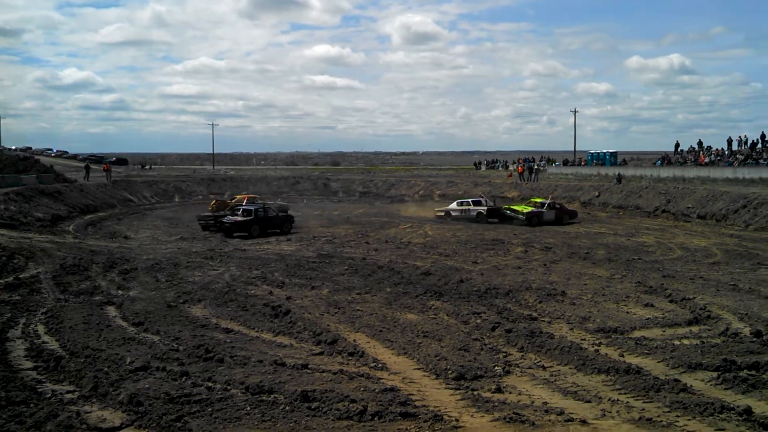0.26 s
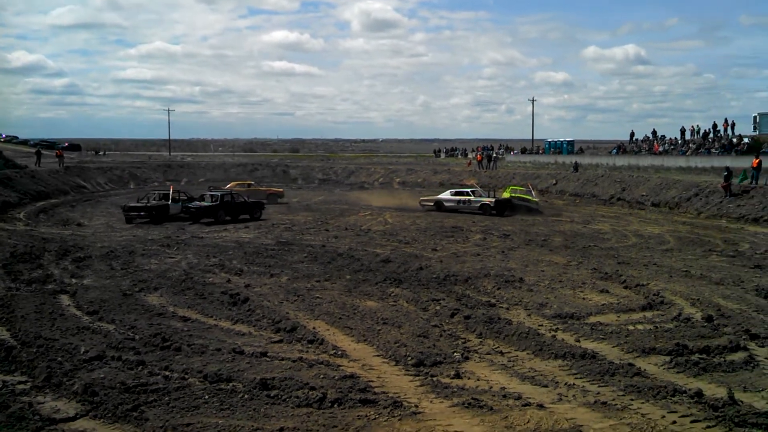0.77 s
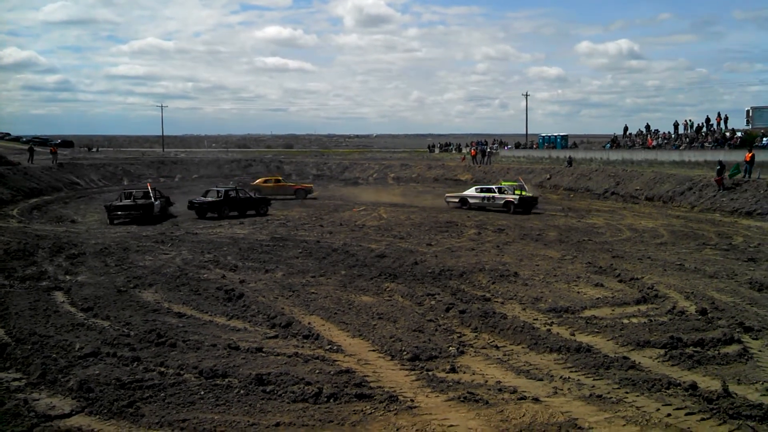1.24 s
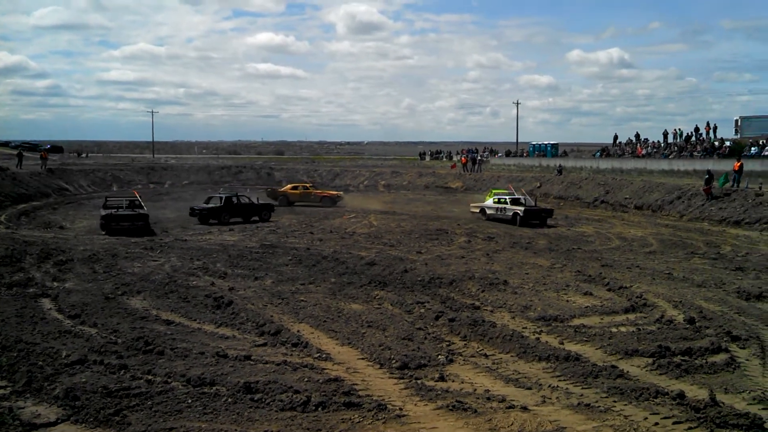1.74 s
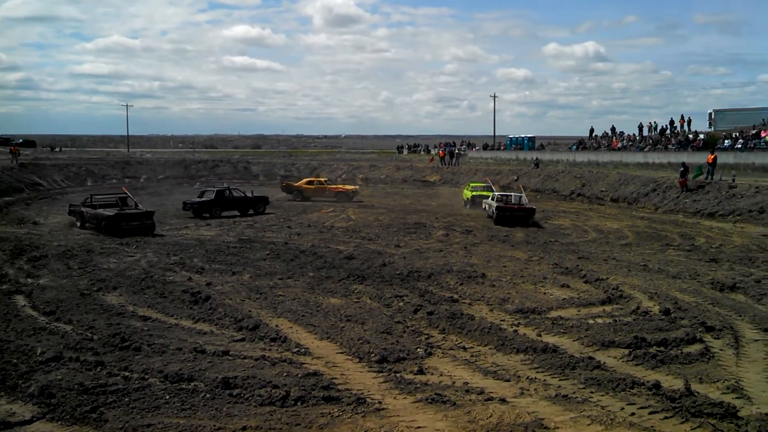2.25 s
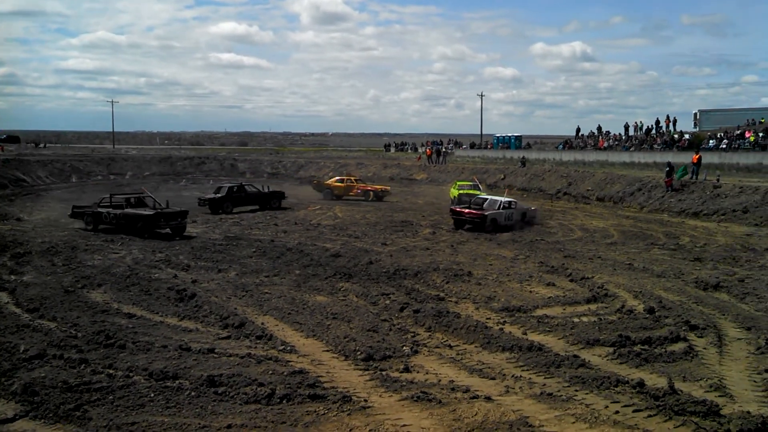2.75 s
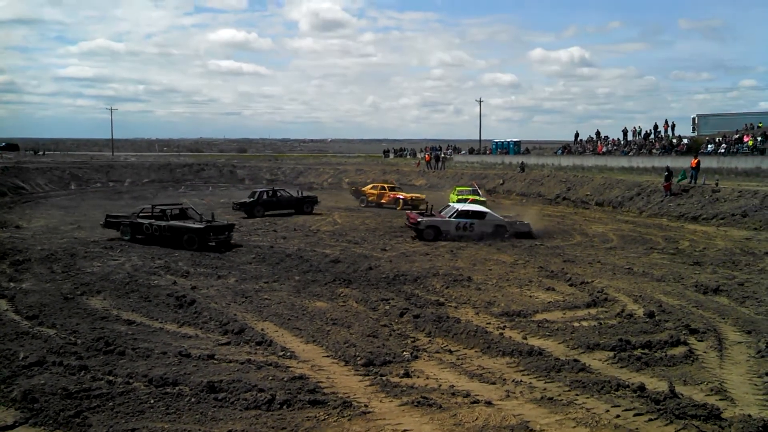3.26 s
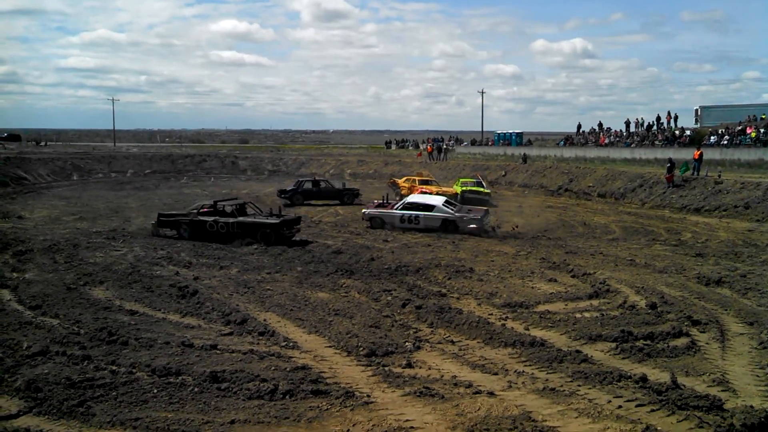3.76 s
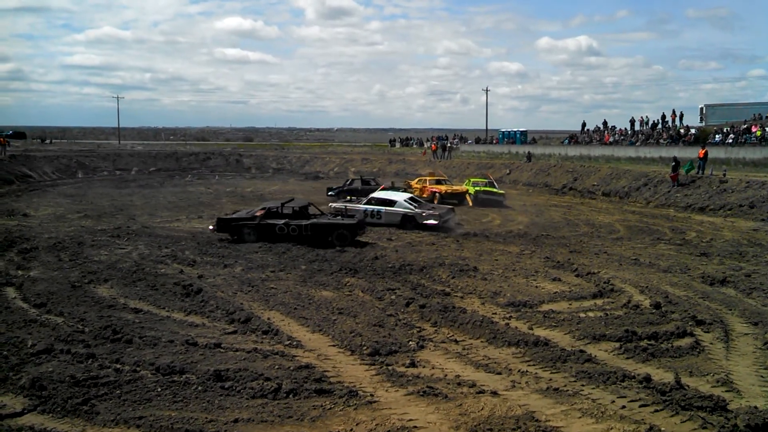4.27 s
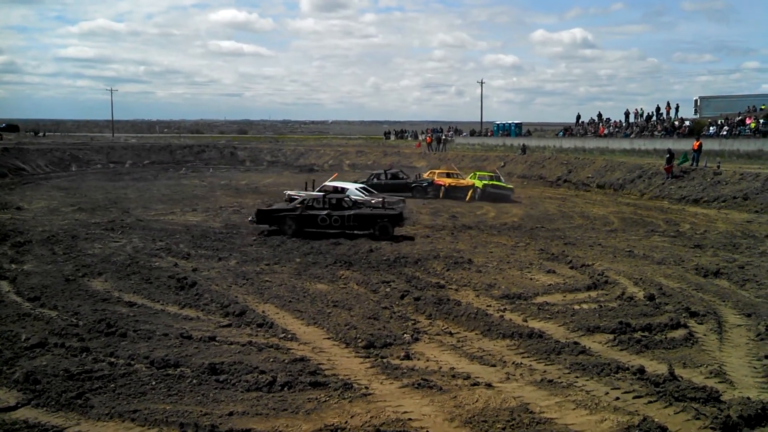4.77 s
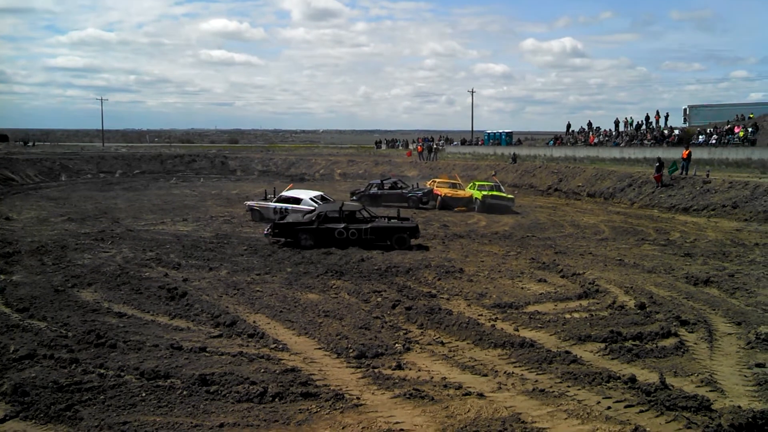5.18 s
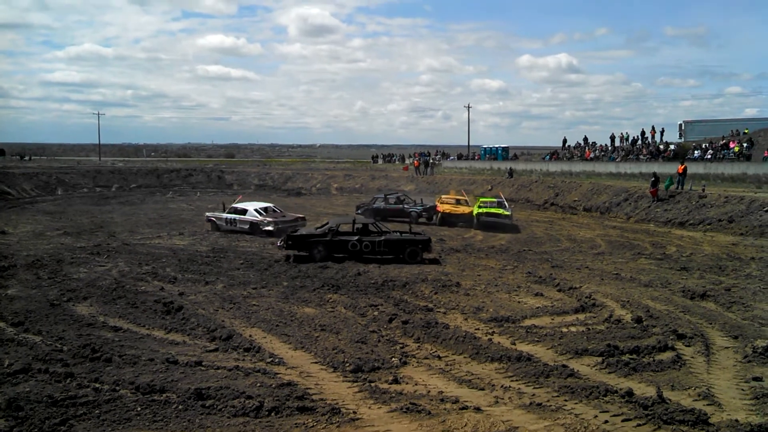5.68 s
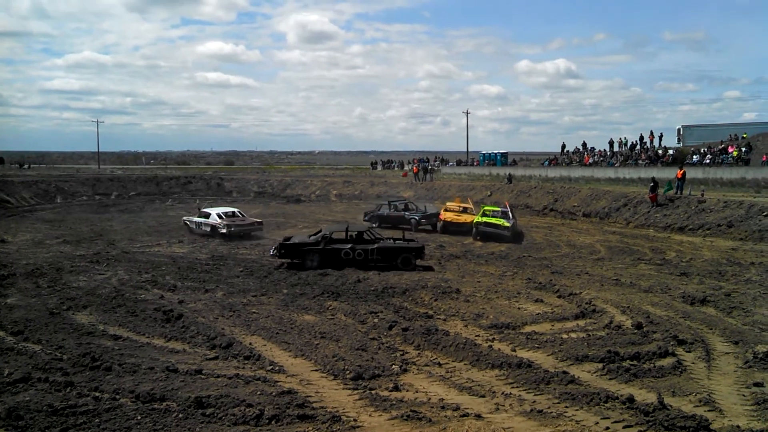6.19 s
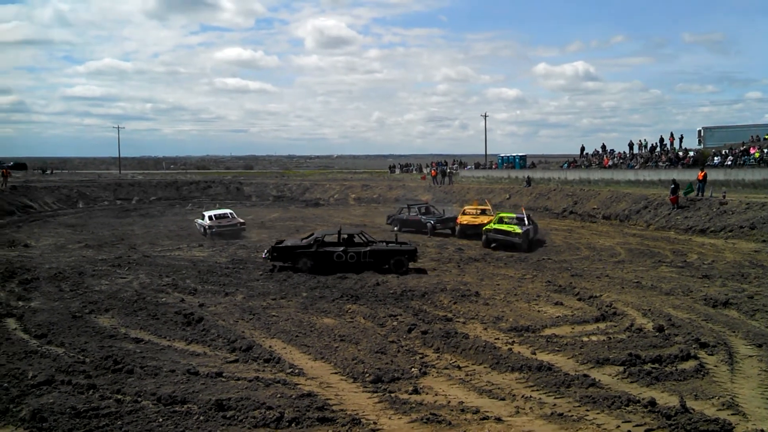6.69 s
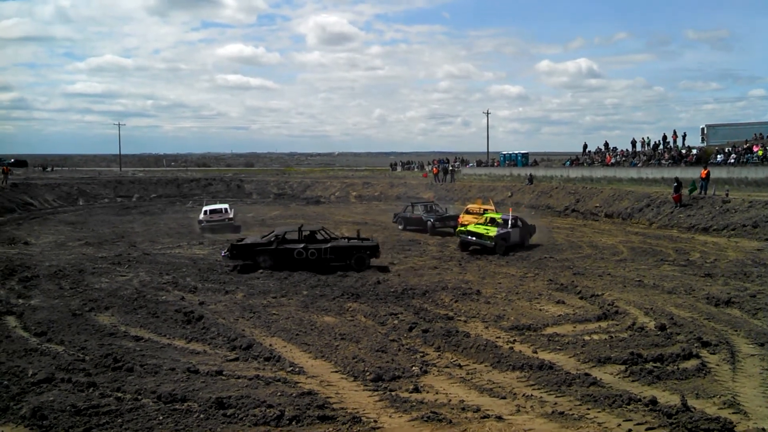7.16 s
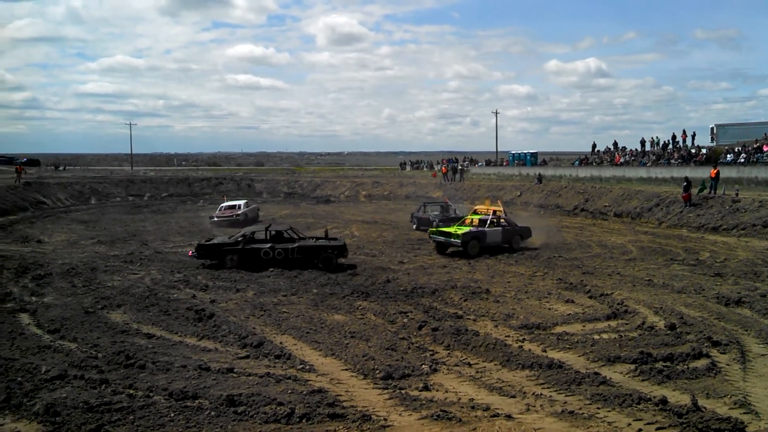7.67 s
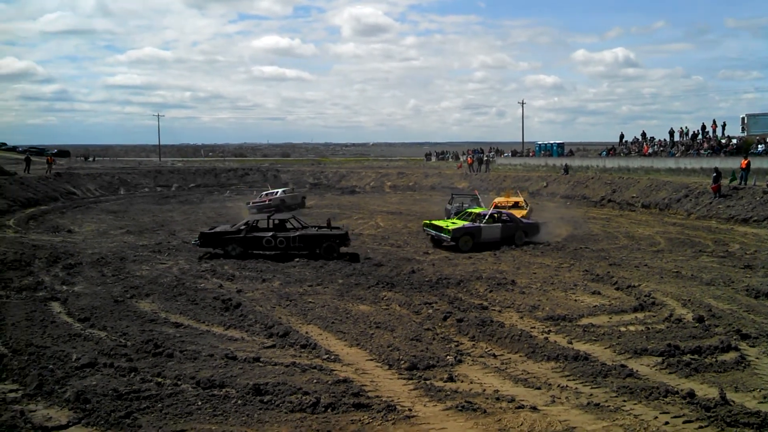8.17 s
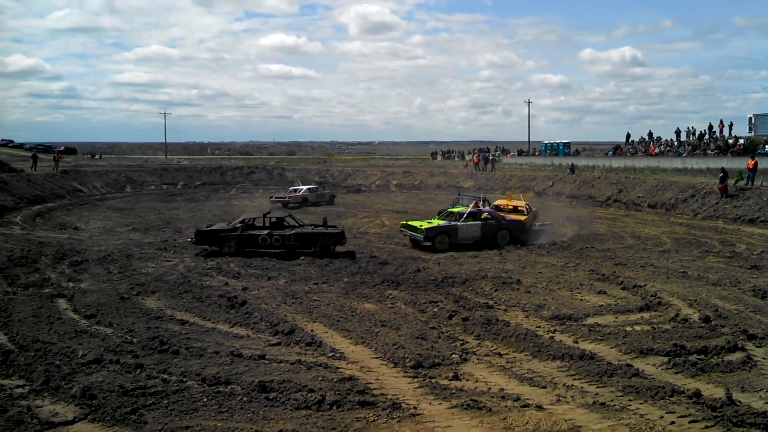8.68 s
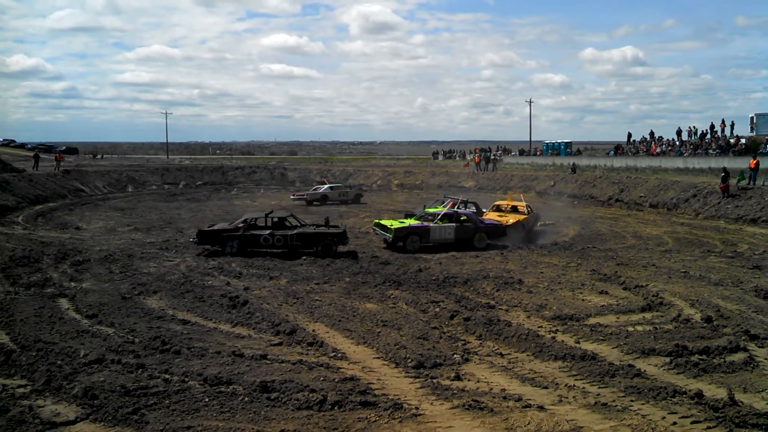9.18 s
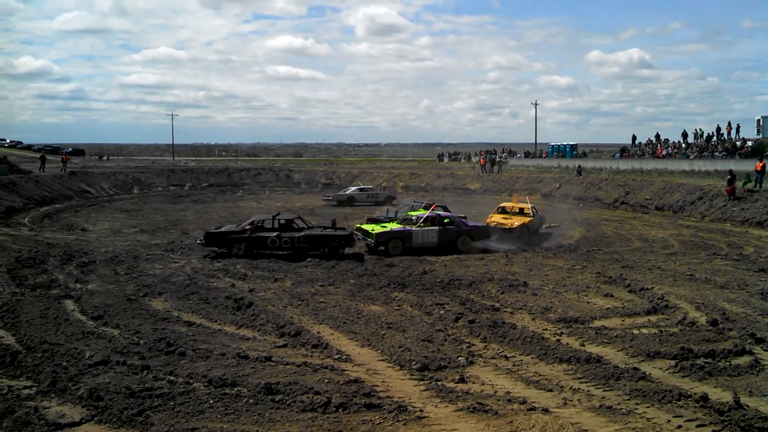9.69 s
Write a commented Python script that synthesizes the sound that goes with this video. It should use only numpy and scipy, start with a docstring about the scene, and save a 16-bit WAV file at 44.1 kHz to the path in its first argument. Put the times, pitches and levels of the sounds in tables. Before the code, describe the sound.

Several old cars with open exhausts rev in overlapping bursts in a dirt arena, heard on a phone some thirty metres away. A raspy engine starts, another climbs steadily in pitch, and others trade stabs of throttle. Exhaust pops and ticks cluster midway, and a deeper engine labours at the end. Spinning wheels throw dirt with a grainy hiss while further cars rumble behind.

```python
"""Open-pipe cars in a dirt arena

Four old eight-cylinder cars rev in bursts, with pops and ticks, some thirty metres from a phone.
Each engine sings the orders of its uneven firing cycle and spits gas once a firing.
Spinning wheels throw dirt, a pipe rings, and further cars rumble behind.
The phone widens its two ports by subtracting each, slightly late, from the other."""
import sys
import numpy as np
from scipy import signal
from scipy.fft import rfft, irfft, next_fast_len
from scipy.io import wavfile

SR = 44100
rng = np.random.default_rng(int(sys.argv[2]) if len(sys.argv) > 2 else 0)


def log_audio(samples):
    """Write samples as a 16-bit WAV file to the path given in sys.argv[1]."""
    # one column per channel
    frames = np.atleast_2d(samples).T
    # limit to full scale, then quantise
    limited = np.clip(frames, -1, 1)
    pcm = np.round(limited * 32767).astype(np.int16)
    wavfile.write(sys.argv[1], SR, pcm)


N = 438348
PADDED = next_fast_len(N, real=True)
LOG_BINS = np.log(np.maximum(np.arange(PADDED // 2 + 1), 1) * SR / PADDED)


def undb(db):
    """Decibels to gain."""
    return 10 ** (np.asarray(db) / 20)


def unit_rms(x):
    """Scale to an RMS of one."""
    return x / np.sqrt(np.mean(x ** 2))


def along(table):
    """Spread the columns that follow f/Hz over every bin of the spectrum."""
    hz, *columns = np.transpose(table)
    return [np.interp(LOG_BINS, np.log(hz), c) for c in columns]


def colour(x, eq):
    """Apply an EQ curve (f/Hz, level/dB), keeping the power of white input."""
    gain = unit_rms(undb(along(eq)[0]))
    return irfft(rfft(x, PADDED) * gain, PADDED)[..., :N]


def ride(fader):
    """A fader ride (t/s, level/dB) as dB at every sample."""
    return np.interp(np.arange(N) / SR, *np.transpose(fader))


def walk(rate, size):
    """Random levels, rate a second, joined by straight lines; spread near 1."""
    at = np.arange(size) * rate / SR
    points = int(at[-1]) + 2
    return 1.2 * np.interp(at, np.arange(points), rng.standard_normal(points))


def turbulence():
    """Two unrelated rows of white noise."""
    return rng.standard_normal((2, N))


def far_cars():
    """Further engines, too tangled to follow, blur into a heaving rumble."""
    fader = [(0.0, -21.5), (0.2, -21), (0.45, -23), (0.72, -26.5), (1.19, -18.5), (1.5, -17.5), (1.9, -21),
             (2.3, -18.5), (2.6, -21.5), (2.75, -15.5), (2.9, -18), (3.1, -18.5), (3.4, -20), (3.8, -18),
             (4.1, -18.5), (4.59, -32), (5.23, -21.5), (5.6, -24.5), (6.0, -20), (6.45, -15), (6.7, -19),
             (6.87, -11.5), (6.95, -23), (7.56, -25), (8.0, -17), (8.25, -26), (8.8, -21), (8.94, -17),
             (9.05, -25), (9.38, -19), (9.5, -16.5), (9.94, -23)]  # swell of the rumble: t/s, level/dB
    eq = [(30, -28), (50, -11), (80, 6.5), (120, 12), (190, 6), (240, -4), (400, -21), (800, -12),
          (1600, -79)]  # its bass-heavy colour: f/Hz, level/dB
    return colour(turbulence() * undb(ride(fader) + 2 * walk(9, N)), eq)


def dirt_spray(crackle):
    """Spinning wheels throw dirt: a grainy hiss that grows as the engines pull."""
    fader = [(0, -39), (0.7, -33), (1.2, -18), (2.2, -56), (3.2, -20.5), (3.8, -25), (4.4, -23.5),
             (4.6, -31), (4.72, -15), (4.9, -19.5), (5.15, -25), (5.3, -26), (5.6, -22.5), (6.2, -25),
             (7, -26), (8, -48), (9, -32), (9.94, -29)]  # thrown dirt: t/s, level/dB
    eq = [(3000, -25), (6000, -2), (9500, -1), (12500, -5), (15500, -14)]  # its bright hiss: f/Hz, level/dB
    grains = undb(ride(fader) + 4 * walk(120, N) + walk(12, N))
    return colour(turbulence() * np.sqrt(crackle) * grains, eq)


def pipe_ring(rasp):
    """A pipe rings, heard when it points this way."""
    fader = [(0.0, -30), (0.45, -29.5), (0.83, -45), (1.19, -35.5), (2.5, -32.5), (3.84, -37.5),
             (4.18, -30), (4.57, -41), (5.12, -34), (5.59, -32), (5.67, -44), (6.28, -30.5), (7.28, -35.5),
             (7.36, -42), (7.69, -35), (8.83, -36.5), (9.0, -40), (9.94, -34)]  # swell of the ring: t/s, level/dB
    eq = [(900, -18.5), (1250, -8), (1420, 0), (1520, -1), (1620, -2.5), (1750, -12.5), (2100, -18.5),
          (3300, -20.5), (3900, -15.5), (4400, -23), (5500, -27)]  # pipe resonance: f/Hz, level/dB
    return colour(turbulence() * undb(ride(fader) + 1.7 * rasp), eq)


def pops_and_ticks():
    """Envelope of short pops, ticks and exhaust cracks, each a few milliseconds long."""
    hits = [(0.2912, -37), (0.408, -36), (0.4953, -28), (0.644, -29), (0.688, -26), (0.713, -18.5),
            (1.233, -28), (2.5105, -24), (2.9826, -21), (3.005, -22), (3.873, -41), (3.9518, -31),
            (4.3134, -34), (4.564, -25), (4.621, -28), (4.6752, -23), (4.7357, -24), (4.8558, -19),
            (4.9261, -31), (4.9511, -25), (5.088, -18), (5.1386, -26), (5.153, -22), (5.201, -21),
            (5.247, -25), (5.282, -17), (6.8611, -33), (7.366, -35), (7.4274, -31)]  # one pop, tick or crack a row: t/s, peak level/dB
    decay_s = .0014
    out = np.zeros(N)
    for at, db in hits:
        start = int(at * SR)
        t = np.arange(min(2000, N - start)) / SR
        out[start:start + len(t)] += undb(db) * np.exp(-t / decay_s)
    return out


def exhaust_gas(buzz, roar, crackle, rasp):
    """Gas tears out of open pipes: a throaty roar and a bright crackle, with pops and ticks on top."""
    roar_eq = [(80, -32), (200, 10), (300, -2.5), (450, 3.5), (580, 2), (700, 7.5), (850, -3), (1050, -5),
               (1300, -8), (1550, -22), (1750, -20), (2000, -7), (2500, -10), (3200, -22.5), (5000, -29.5)]  # body of the gas: f/Hz, level/dB
    crackle_eq = [(800, -100), (1800, 4.5), (2400, 1.5), (3100, 2.5), (3900, 2), (4600, -0.5), (5500, -4.5),
                  (6800, -2.5), (8000, -3.5), (10000, -1), (12500, -8.5), (15500, -16)]  # its sizzling top: f/Hz, level/dB
    crack_eq = [(200, -12), (700, -3), (1400, 17), (2200, -14), (3500, -26), (6000, -34)]  # midrange snap of the pops and ticks: f/Hz, level/dB
    pops = pops_and_ticks()
    body_noise, top_noise = turbulence(), turbulence()
    body = colour(undb(-6.5) * (buzz + body_noise * roar * undb(1.9 * rasp)), roar_eq)
    cracks = colour(undb(-3.5) * body_noise * pops, crack_eq)
    top = colour(top_noise * (undb(-.5) * crackle + undb(-1) * pops), crackle_eq)
    return body + cracks + top


def engine_note(tone):
    """Deepen the engine note by 6 dB an octave, then colour it."""
    eq = [(60, 0), (150, 0), (250, -2), (400, -1), (550, 1), (680, 0), (800, -2.5), (950, -7), (1200, -3)]  # colour on top of that tilt: f/Hz, level/dB
    tilted = undb(24) * signal.lfilter([.007], [1, -.993], tone)
    return irfft(rfft(tilted, PADDED) * undb(along(eq)[0]), PADDED)[:N]


def engine_order(cycle, k, db):
    """Harmonic k of the firing cycle; uneven burning makes it waver, the higher the faster and deeper."""
    if db <= -40:
        return 0
    wobble_db, drift_db = 3.2, 2
    depth = min(k / 16, 1) * np.clip(.4 - db / 10, .4, 1)  # strong orders hold steadier
    waver_db = wobble_db * walk(k, len(cycle)) + drift_db * walk(7, len(cycle))
    return undb(db + depth * waver_db) * np.sin(2 * np.pi * (k * cycle + rng.random()))


def throttle_burst(levels, speed, crackle_db, orders, firings):
    """One stab of throttle: start sample, engine tone, gas buzz, powers of roar and crackle."""
    jitter, scatter_db, puff_decay = .003, 2, .92  # share of speed; per firing; share of a firing
    times, *columns = np.transpose(levels)
    start, stop = int(max(times[0], 0) * SR), min(int(times[-1] * SR), N)
    t = np.arange(start, stop) / SR
    hz = np.interp(t, *np.transpose(speed))
    low_db, high_db, roar_db = (np.interp(t, times, c) for c in columns)
    # 40 ms fades, except at the edges of the scene
    since_start = t - t[0] + (t[0] < .05)
    until_end = t[-1] - t + (stop > N - .05 * SR)
    fade = np.clip(np.minimum(since_start, until_end) / .04, 0, 1)
    cycle = np.cumsum(hz * (1 + jitter * walk(30, len(t)))) / SR
    partials = [engine_order(cycle, k, db) for k, db in orders]
    tone = fade * (undb(low_db) * sum(partials[:11]) + undb(high_db) * sum(partials[11:]))
    # eight puffs a cycle: the crackle dies fast, the roar hangs on
    firing, phase = np.divmod(8 * cycle, 1)
    firing = firing.astype(int)
    puff_db = np.take(firings, firing, mode="wrap") + scatter_db * rng.standard_normal(1000)[firing]
    gas = fade * undb(roar_db)
    roar = gas * unit_rms(undb(puff_db / 2) * np.exp(-phase / (3 * puff_decay)))
    crackle = gas * undb(crackle_db) * unit_rms(undb(puff_db) * np.exp(-phase / puff_decay))
    # the pipes shape the gas alike on every cycle: a buzz above the sung orders, up to the 64th
    upper_orders = np.exp(2j * np.pi * rng.random(65)) * (np.arange(65) > len(orders))
    wavetable = unit_rms(irfft(upper_orders, 2048))
    buzz = np.interp(cycle % 1, np.arange(2048) / 2048, wavetable)
    buzz *= gas * undb(.5) * np.sqrt(128 * hz / SR)
    return start, tone, buzz, roar ** 2, crackle ** 2


def near_cars():
    """Four engines trade bursts of throttle: summed tone, buzz, roar envelope and crackle envelope."""
    # throttle, a table per burst: t/s, orders 1-11 level/dB, higher orders level/dB, roar level/dB
    raspy = [
        [(0.0, -33, -29, -22.5), (0.12, -32.5, -31, -21), (0.25, -34, -32.5, -22.5), (0.37, -30, -30, -22),
         (0.49, -33, -31.5, -23.5), (0.62, -30, -32, -25.5), (0.68, -37, -55, -40)],
        [(1.5, -50, -51, -37), (1.6, -46, -37, -22.5), (1.8, -45, -41, -21.5), (1.9, -38, -43, -44)],
        [(1.92, -37, -40, -25), (2.06, -47, -46, -22.5), (2.25, -45, -38, -19)],
        [(2.8, -44, -32.5, -34), (2.94, -25, -28.5, -27), (3.06, -30, -31, -17.5), (3.21, -28, -27.5, -19),
         (3.3, -31.5, -32, -22.5), (3.4, -30, -44, -41)],
        [(3.7, -35, -42, -40), (3.94, -51, -38, -26.5), (4.09, -29, -36, -20.5), (4.2, -32, -34, -18.5),
         (4.27, -34, -40, -22.5), (4.42, -33, -31, -22)],
        [(4.38, -34, -36, -32), (4.52, -35.5, -37.5, -28.5), (4.68, -37, -31.5, -24.5),
         (4.85, -37, -33.5, -26.5), (5.05, -35, -34.5, -24), (5.18, -38, -36, -21), (5.29, -51, -38, -24),
         (5.41, -40, -39, -24.5), (5.58, -31, -37, -24), (5.64, -40, -43.5, -30.5), (5.9, -31, -34.5, -25)],
        [(6.9, -30, -42, -39), (7.02, -31, -25, -30), (7.07, -26, -27.5, -24), (7.14, -32, -25, -26.5),
         (7.28, -28.5, -26.5, -24), (7.38, -31.5, -27.5, -27.5), (7.47, -37, -27, -26),
         (7.63, -30, -25.5, -24.5), (7.76, -27, -34.5, -28.5), (7.95, -43, -34.5, -35)],
        [(7.91, -45, -34, -29), (8.06, -32, -38, -27), (8.19, -29, -37.5, -29.5), (8.45, -50, -35, -35),
         (8.66, -30, -34, -26.5), (8.9, -28, -33.5, -28)],
    ]
    climber = [
        [(0.66, -32, -44, -24), (0.78, -31, -47, -47), (0.93, -34, -62, -49), (1.06, -38, -44, -29.5),
         (1.16, -43, -41, -26.5), (1.33, -37, -42, -30), (1.43, -25, -36, -24), (1.55, -34, -39, -22),
         (1.68, -33, -46, -45), (1.87, -29, -35.5, -19.5), (2.03, -25.5, -35, -21.5), (2.15, -29, -35, -20.5),
         (2.28, -30, -33.5, -20), (2.42, -30.5, -29, -18), (2.55, -33, -31, -17.5), (2.63, -32, -30, -15)],
        [(2.4, -43, -41, -30), (2.5, -43, -31, -23), (2.59, -30, -26.5, -19), (2.68, -36, -30, -17),
         (2.78, -35, -34.5, -28.5), (2.84, -36, -36, -20.5), (2.95, -46, -53, -17.5), (3.15, -55, -55, -34)],
    ]
    droner = [
        [(3.25, -61, -48, -24.5), (3.36, -33, -37, -19), (3.6, -30, -33.5, -21.5), (3.71, -38, -34, -24),
         (3.8, -35, -52, -44)],
        [(5.85, -50, -29, -22.5), (5.97, -30, -34, -26), (6.35, -30, -27, -25), (6.61, -30.5, -29.5, -25.5),
         (6.72, -28.5, -33, -22.5), (6.87, -43, -31, -23), (6.98, -31.5, -30, -20.5), (7.12, -32.5, -50, -20.5),
         (7.33, -38, -56, -32), (7.47, -26, -39, -21)],
    ]
    pusher = [
        [(7.45, -33, -47, -33), (7.69, -37, -26, -26), (7.81, -37, -32, -26), (8.05, -31, -30.5, -25.5),
         (8.17, -38, -29.5, -27), (8.31, -28, -39, -25.5), (8.52, -28.5, -32, -28.5), (8.62, -29, -38, -28),
         (8.72, -33, -43, -29.5), (8.9, -27, -32, -28.5), (8.98, -31.5, -35, -36), (9.18, -27, -32.5, -31),
         (9.38, -32.5, -32, -27), (9.48, -21, -24, -31)],
        [(9.43, -26, -30, -23.5), (9.53, -18.5, -28.5, -27.5), (9.65, -19.5, -31, -31.5),
         (9.94, -18.5, -28, -24)],
    ]
    # revs, as the rate of the whole eight-cylinder cycle: t/s, f/Hz
    raspy_speed = [(0.0, 32.66), (0.19, 35.75), (0.29, 35.46), (0.39, 33.06), (0.47, 31.2), (0.6, 31.9),
                   (0.68, 31.3), (1.5, 22.96), (1.9, 22.55), (1.92, 30.29), (2.0, 31.45), (2.08, 31.83),
                   (2.25, 30.1), (2.8, 27.3), (2.95, 28.0), (3.14, 31.42), (3.23, 32.12), (3.4, 30.8),
                   (3.7, 22.63), (4.09, 24.55), (4.27, 27.26), (4.37, 27.42), (4.56, 26.8), (4.85, 27.95),
                   (5.13, 25.55), (5.25, 25.29), (5.48, 25.23), (5.9, 24.37), (6.9, 28.49), (7.09, 33.04),
                   (7.19, 34.46), (7.28, 34.95), (7.4, 34.2), (7.62, 31.95), (7.76, 29.17), (7.93, 24.9),
                   (8.04, 24.07), (8.33, 23.5), (8.6, 25.3), (8.9, 25.69)]
    climber_speed = [(0.66, 14.62), (0.93, 18.6), (1.06, 21.01), (1.16, 21.6), (1.33, 20.72), (1.56, 20.55),
                     (1.87, 20.8), (2.03, 22.0), (2.15, 23.16), (2.26, 24.85), (2.39, 26.1), (2.47, 27.5),
                     (2.6, 29.5), (2.71, 29.4), (2.8, 29.2), (2.95, 31.4), (3.15, 34.0)]
    droner_speed = [(3.25, 22.83), (3.54, 26.4), (3.63, 26.5), (3.8, 23.14), (5.85, 22.73), (6.12, 23.27),
                    (6.35, 23.3), (6.61, 23.77), (6.72, 23.68), (6.87, 23.33), (7.12, 23.3), (7.47, 22.51)]
    pusher_speed = [(7.45, 14.55), (8.31, 19.54), (8.56, 19.55), (8.68, 20.2), (8.8, 21.0), (8.9, 21.3),
                    (9.04, 21.22), (9.38, 20.74), (9.48, 20.0), (9.6, 19.82), (9.94, 19.7)]
    # what each exhaust sings: multiple of the cycle, level/dB
    raspy_voice = [(1, -47), (2, -29), (3, -13), (4, -18), (5, -4), (6, -16), (7, -14), (8, -8), (9, -26),
                   (10, -15), (11, -16), (12, -15), (13, -5.5), (14, -18.5), (15, -13), (16, -10),
                   (17, -7.5), (18, -7.5), (19, -9.5), (20, -8.5), (21, 1.5), (22, -10), (23, -9.5),
                   (24, -6.5), (25, -13), (26, -8), (27, -9), (28, -7)]
    turned = [(1, -32), (2, -27), (3, -11), (4, -4), (5, 0), (6, -10), (7, -13), (8, -7.5), (9, -14),
              (10, -12), (11, -3.5), (12, -10), (13, 1.5), (14, -14), (15, -9), (16, -5), (17, -6.5),
              (18, -16), (19, -4), (20, -16), (21, -0.5), (22, -6.5), (23, -12), (24, -24), (25, -10),
              (26, -29)]  # the raspy car with its pipes facing away
    labouring = [(1, -47), (2, -24), (3, -11), (4, -6), (5, -1.5), (6, -6), (7, -11), (8, -3.5), (9, -7.5),
                 (10, -18), (11, -17), (12, -23), (13, -4), (14, -26), (15, -12), (16, -13.5), (17, -7),
                 (18, -9.5), (19, -3), (20, -8.5), (21, -1.5), (22, -6), (23, -8), (24, -4.5), (25, -5.5),
                 (26, -0.5), (27, -14), (28, -14)]  # the raspy car at low speed under load
    climber_voice = [(1, -45), (2, -31), (3, -28), (4, -26), (5, -10.5), (6, -16), (7, -8.5), (8, 0),
                     (9, -33), (10, -32), (11, -31), (12, -11), (13, -11.5), (14, -14), (15, -18), (16, -6),
                     (17, -10), (18, -43), (19, -14), (20, -27), (21, -4.5), (22, -45.5), (23, -7), (24, 0),
                     (25, -22), (26, -25), (27, -9), (28, -23)]
    topped = [(1, -45), (2, -33), (3, -18), (4, -17), (5, -11), (6, -5), (7, -22), (8, 1), (9, -25),
              (10, -28), (11, -17), (12, -16), (13, -21), (14, -20), (15, -27), (16, -1), (17, -14),
              (18, -19), (19, -19), (20, -13), (21, 0), (22, -5), (23, -10), (24, -1), (25, -11), (26, -4),
              (27, -5), (28, -12)]  # the climber once it tops out
    droner_voice = [(1, -50), (2, -33), (3, -36), (4, -30), (5, 1), (6, -12), (7, -24), (8, -6.5), (9, -41),
                    (10, -32), (11, -43), (12, -25), (13, -21), (14, -15), (15, -11.5), (16, -9.5),
                    (17, -20.5), (18, -68.5), (19, -12), (20, -12.5), (21, -11), (22, -12), (23, -10.5),
                    (24, -14), (25, -8), (26, -8.5), (27, -17), (28, -3), (29, -4.5), (30, -4)]
    pusher_voice = [(1, -46), (2, -33), (3, -37), (4, -14), (5, -12), (6, -6.5), (7, -61.5), (8, 2),
                    (9, -51), (10, -1), (11, -45), (12, -5), (13, -45), (14, -5), (15, -32), (16, -12),
                    (17, -20), (18, -43), (19, -21), (20, -20.5), (21, -23), (22, -58), (23, -44),
                    (24, -24), (25, -50), (26, -21), (27, -76), (28, -15), (29, -98), (30, -8)]
    loaded = [(1, -50), (2, -56), (3, -37), (4, -49), (5, -46), (6, -19.5), (7, -31), (8, -37), (9, -45.5),
              (10, -2.5), (11, -33), (12, -10), (13, -23), (14, -7), (15, -17), (16, -12), (17, -35),
              (18, -19), (19, -19), (20, -43), (21, -32), (22, -21), (23, -45.5), (24, -19), (25, -38),
              (26, -34), (27, -34), (28, -14), (29, -42), (30, -25)]  # the pusher leaning on another car
    firing_patterns = [
        [0, -4, -1, -5, 0, -3, -5, -2],
        [0, -2, -1, -3, 0, -2, -1, -3],
        [0, -4, -2, -5, -1, -3, -5, -1],
        [0, -4, -1, -4, 0, -5, -1, -4],
    ]  # lope of the eight firings, a row per car: level/dB
    crackle_trims = dict(raspy=[-6.5, -12, -26, -11.5, -11.5, -7, -7.5, -10.5], climber=[-10.5, -11],
                     droner=[-11.5, -12.5], pusher=[-8, -10.5])  # crackle against roar, by car, one per burst: level/dB
    raspy_voices = [turned] + [raspy_voice] * 3 + [labouring] * 2 + [raspy_voice] * 2
    fleet = [("raspy", raspy, raspy_speed, raspy_voices),
             ("climber", climber, climber_speed, [climber_voice, topped]),
             ("droner", droner, droner_speed, [droner_voice] * 2),
             ("pusher", pusher, pusher_speed, [pusher_voice, loaded])]
    stems = np.zeros((4, N))
    for (name, bursts, speed, voices), firings in zip(fleet, firing_patterns):
        for levels, crackle_db, orders in zip(bursts, crackle_trims[name], voices):
            start, *parts = throttle_burst(levels, speed, crackle_db, orders, firings)
            stems[:, start:start + len(parts[0])] += parts
    tone, buzz, roar_power, crackle_power = stems
    return tone, buzz, np.sqrt(roar_power), np.sqrt(crackle_power)


def scene():
    """Row 0 is the mix at the first port; row 1 has the same tones and envelopes on unrelated noise."""
    tone, buzz, roar, crackle = near_cars()
    # the further cars add an even bed of gas noise, in power
    roar, crackle = np.hypot(roar, undb(-31.5)), np.hypot(crackle, undb(-55.5))
    rasp = walk(110, N)  # the flow tears unevenly, in roar and ring alike
    background = far_cars() + dirt_spray(crackle) + pipe_ring(rasp)
    return background + exhaust_gas(buzz, roar, crackle, rasp) + engine_note(tone)


def record(dry):
    """The phone's two ports, each minus the late other one, then a steep high cut."""
    port = [(30, 0, -.1, .99), (65, 1.3, -.22, 1), (120, .6, -.14, 1), (220, .6, -.05, 1),
            (350, 2.4, -.2, .99), (440, 0, -.5, .98), (520, -3.5, 0, .99), (620, -1.5, .25, .99),
            (800, 2.5, .1, .97), (1000, -2, -.5, .8), (1500, 1, -.8, .6), (2200, 5, -1.2, .8),
            (3000, -3, 0, .3), (6000, -4, 0, .08), (15000, -4, 0, 0)]  # second port against the first: f/Hz, level/dB, phase/rad, likeness 0-1
    lag_samples, widen_share, top_hz = 16, .995, 15560
    db, phase, alike = along(port)
    alike = np.clip(alike, 0, .995)
    spectra = rfft(dry, PADDED)
    blend = alike * spectra[0] + np.sqrt(1 - alike ** 2) * spectra[1]
    second = irfft(undb(db) * np.exp(1j * phase) * blend, PADDED)[:N]
    ports = np.array([dry[0], second])
    late = np.pad(ports[::-1], ((0, 0), (lag_samples, 0)))[:, :N]
    high_cut = signal.ellip(10, .2, 80, top_hz, fs=SR, output="sos")
    return signal.sosfilt(high_cut, ports - widen_share * late)


dry = scene()
out = record(dry)
log_audio(out)
```